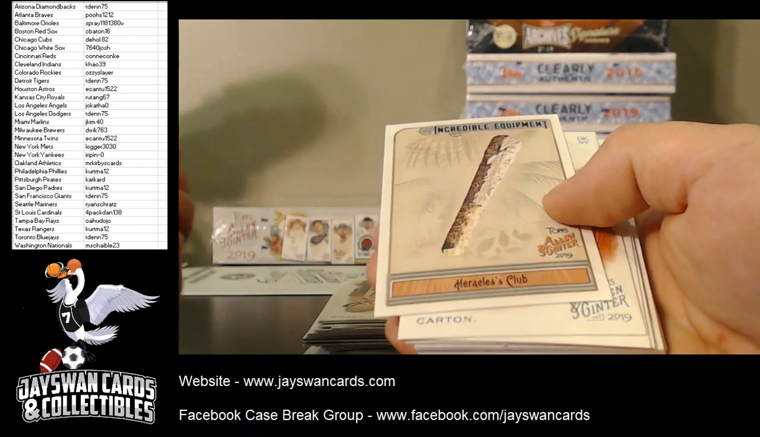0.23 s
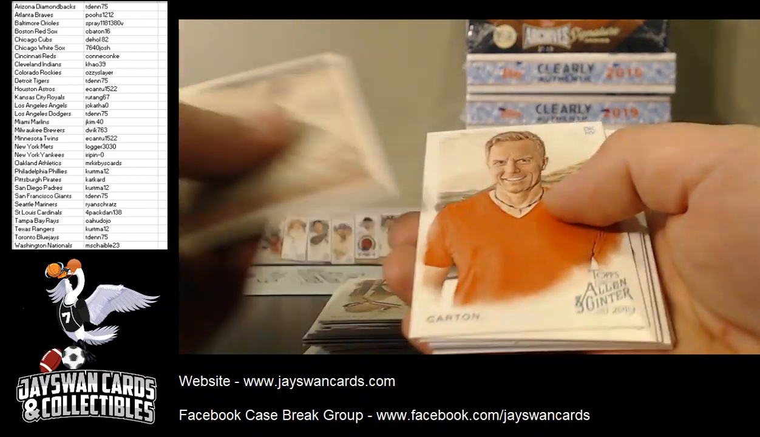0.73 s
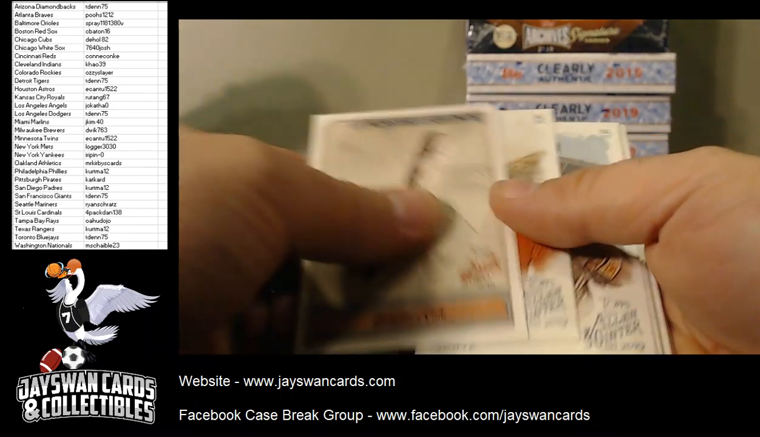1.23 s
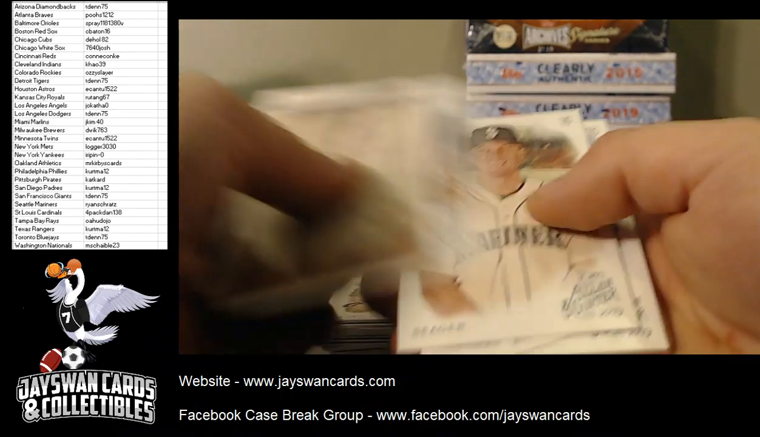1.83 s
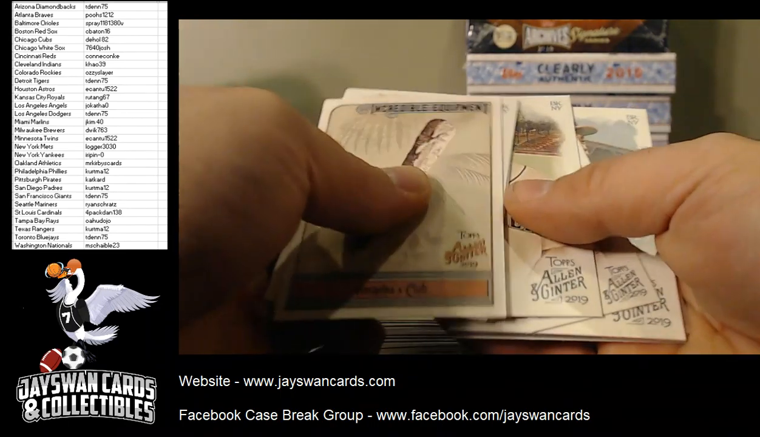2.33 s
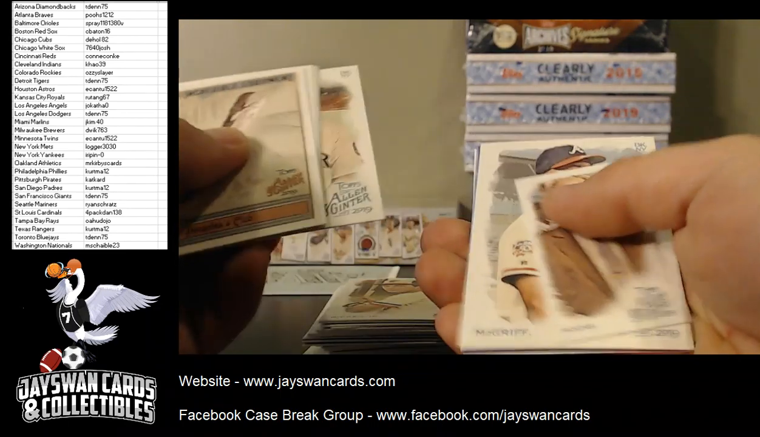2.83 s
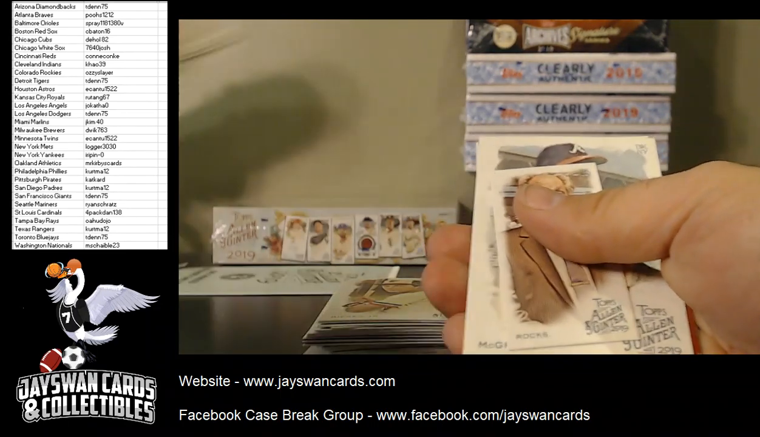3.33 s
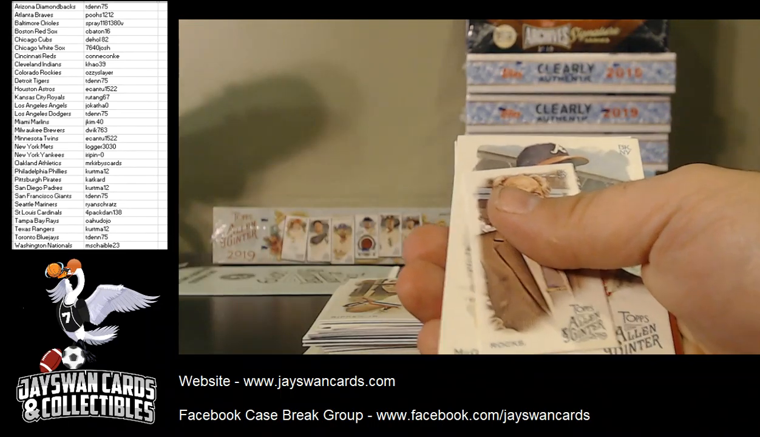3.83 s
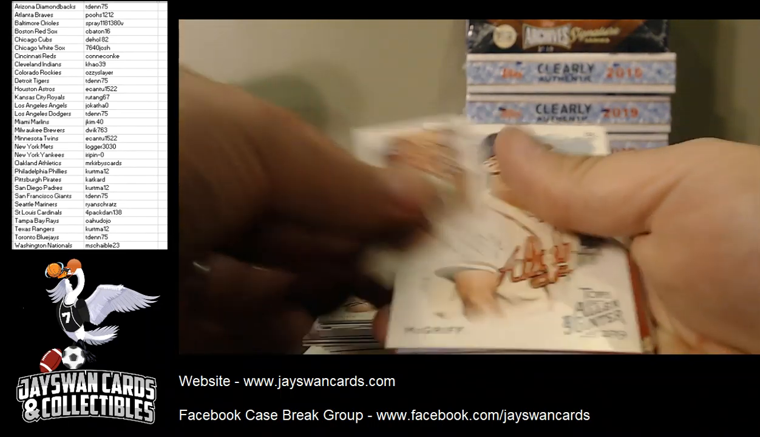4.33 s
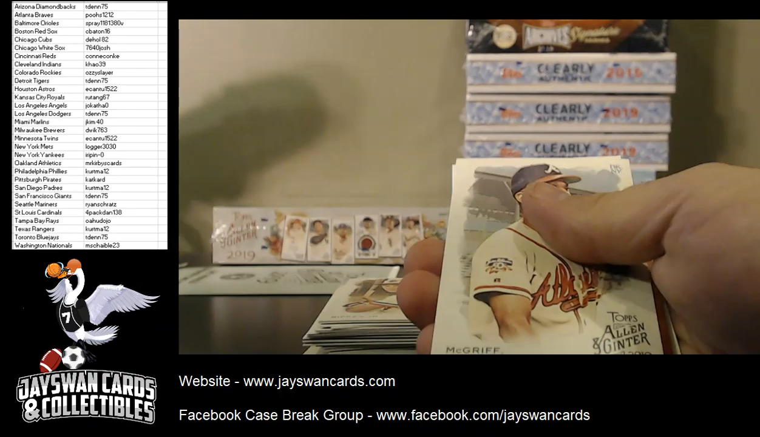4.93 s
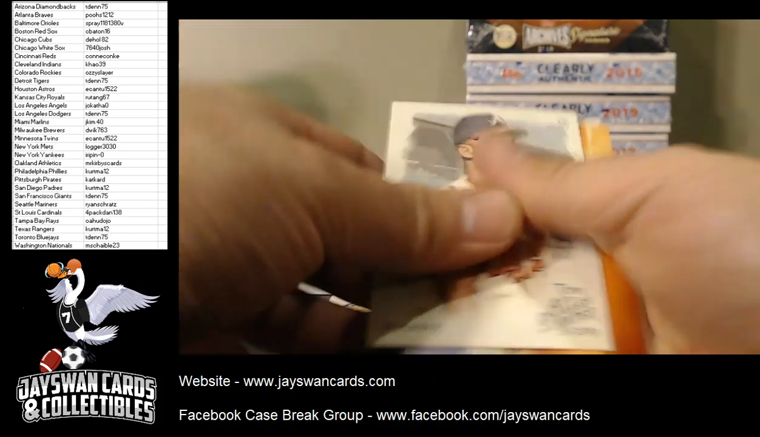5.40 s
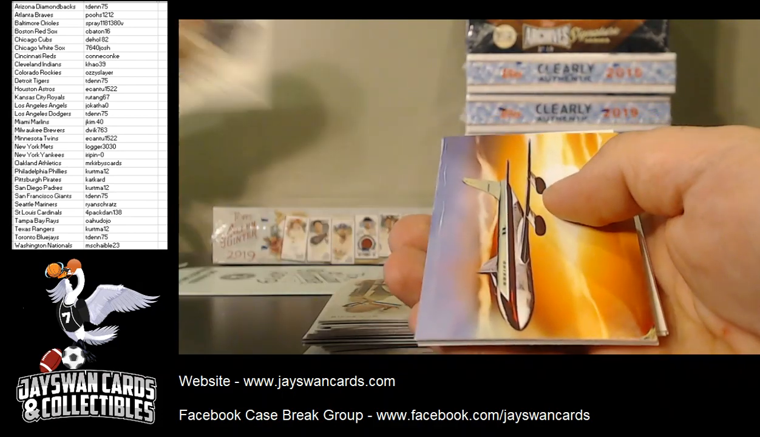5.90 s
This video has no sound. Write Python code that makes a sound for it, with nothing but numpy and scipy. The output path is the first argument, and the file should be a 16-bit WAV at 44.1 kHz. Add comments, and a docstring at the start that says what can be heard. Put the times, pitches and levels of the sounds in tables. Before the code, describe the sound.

Close, papery swishes and clicks of cards being flipped through by hand, with two louder table knocks near the end.

```python
"""A quick hiss and a few sharp ticks: trading cards thumbed one by one off a hand-held stack,
close to the stereo microphone of a camera standing on a table in a small room.
Card faces rub as they slide, edges catch and snap free, and midway a thumb judders over the top card.
The hands bump the table, which thuds and sets the camera stand swaying. Faint room hum lies behind."""
import sys
import numpy as np
from scipy import signal
from scipy.fft import rfft, irfft
from scipy.io import wavfile
from scipy.ndimage import uniform_filter1d

SR = 44100
rng = np.random.default_rng(int(sys.argv[2]) if len(sys.argv) > 2 else 0)


def materialize(psi):
    """Save the field psi as 16-bit PCM at rate SR to the path in sys.argv[1].

    A 1-D psi becomes a single channel; in a 2-D psi each row is a channel.
    """
    bounded = np.clip(np.atleast_2d(psi).T, -1, 1)
    quanta = np.round(bounded * 32767).astype(np.int16)
    wavfile.write(sys.argv[1], SR, quanta)


N = 271653
TIME = np.arange(N) / SR
BAND_LIMIT_HZ = 15950

# Card sliding over card: top_speed_s, rise_s, fall_s, hiss_db, scrape_re_hiss_db, gap_pitch_hz
CARD_STROKES = [ (.06, 0.11, 0.1, -53.5, -4.5, 3300), (.105, 0.022, 0.016, -45, -3, 3125),
                (.143, 0.016, 0.02, -44.5, -8, 3340), (.63, 0.20384, .19, -62.5, -4.5, 2600),
                (.722, 0.039, 0.04636, -59.5, -4.5, 4200), (.945, 0.16, 0.053, -65.5, -5, 2200),
                (1.47, 0.099, 0.029, -59.5, -3.5, 2980), (1.545, 0.062, 0.12, -46.5, -8, 3930),
                (1.70, 0.18, 0.13994, -60.5, -4, 3580), (2.09, 0.11, 0.14, -50.5, -6.5, 5030),
                (2.10, 0.029, 0.024, -46.5, -1, 5170), (2.285, 0.098, 0.08, -49.5, -8.5, 4180),
                (2.375, 0.073, 0.097, -55, -0.5, 2970), (2.5, 0.16, 0.15, -55, -6.5, 3800),
                (2.59, 0.064, 0.12, -46, -9, 3940), (2.77, 0.083, 0.1, -43.5, -11.5, 4500),
                (2.812, 0.026, 0.058, -54, -3, 3600), (2.92, 0.073, 0.073, -55.5, 0, 2410),
                (3.02, 0.085, 0.16, -51.5, -8, 3800), (3.18, 0.079, 0.099, -47.5, -9.5, 4300),
                (3.44, 0.22, 0.09, -60, -2, 3440), (3.566, 0.063, 0.085, -44, -10, 3360),
                (3.73, 0.22, 0.19, -56.5, -1.5, 2500), (3.97, .17, 0.17, -64, -3, 2800),
                (4.135, .04, 0.053, -55.5, -4, 2780), (4.21, 0.11, 0.051, -55, -2.5, 2909),
                (4.45, 0.12, 0.053, -60.5, -4.5, 3650), (4.607, 0.033, 0.051, -40.5, -9, 5150),
                (4.645, .04, .1, -46, -7, 4740), (5.09, 0.19, 0.26, -61, -4, 3800),
                (5.332, .14, 0.088, -46, -9, 4230), (5.575, .11, .045, -55.5, -4.5, 3400),
                (5.74, 0.031, 0.039, -54.5, -4, 3100), (5.795, 0.053, 0.027, -43.5, 0, 3130),
                (5.827, 0.013, 0.026, -41.5, -5.5, 3200), (5.88, 0.021, 0.013, -52, -18, 3300)]
# Card faces rubbing: frequency_hz, density_db
FRICTION_SPECTRUM = [(120, -29), (200, -9.5), (409, -5), (519, -8), (623, -10), (916, -6), (1400, -11.5),
                     (1870, -6.5), (2960, -8), (3250, -7.5), (4860, -6.5), (5330, -9.5), (7270, -5.5),
                     (14600, -13.5), (16000, -13)]
# Rumble of the moving hands: frequency_hz, density_db
HAND_SPECTRUM = [(12, -28), (20, 7), (73, -3), (145, -19), (292, -9.5), (357, -47), (398, -12), (500, -29),
                 (650, -62), (1100, -120)]
# Edges catching and letting go: start_s, level_db, tilt_db_per_octave, decay_ms, stack_ring_db
EDGE_TICKS = [(0.0117, -42.5, -3.5, 1.3, 4.5), (0.0424, -49.5, -4, 3.7, 11.5), (.096, -37.5, -2, 1.7, -8),
              (0.103, -39.5, -16, 3.1, -17), (0.1067, -37, -1.5, 2, -0.5), (0.1178, -42.5, -6.5, 1, 9),
              (1.633, -44.5, -0.5, 3.9, 4.5), (1.762, -52.5, 1, 4.4, -6), (2.0633, -44, -4.5, 1.7, 1),
              (2.093, -41, -9.5, 3, -12), (2.103, -37.5, 2.5, 5.5, -18), (2.361, -50.5, -0.5, 4.53, 7.5),
              (2.567, -47, -6.5, 6.4, 4.5), (2.575, -35.5, 7.5, 7.3, -28), (3.151, -44, -5, 9.1, 3.5),
              (3.299, -51.5, -4.5, 1.2, 4), (3.599, -43.5, -3.5, 2.8, 5), (3.661, -55.5, -12, 1.8, 7),
              (4.544, -46, -7, 2.8, 0), (4.594, -45.5, 0, 5, -8), (4.691, -44.5, -1.5, 2.2, -18),
              (5.368, -39, -6.5, 1.6, -4.5), (5.7, -59, 5, 3, -10), (5.7177, -42, -5, 1.4, 6.5),
              (5.7625, -22.5, 0, 1.95, -6.5), (5.777, -43, -5, 2.3, -16), (5.8088, -33, -3.5, 0.2, 3)]
# The crack of a card edge: frequency_hz, density_db
EDGE_SPECTRUM = [(120, -35), (200, -9.5), (763, -6.5), (1180, -6.5), (2020, -6.5), (2330, -1), (3430, -4.5),
                 (3900, -1.5), (6050, -2.5), (7540, -4), (8900, -5.5), (13600, -10.5), (16000, -29)]
# The held stack ringing: pitch_hz, level_db, t60_s
STACK_MODES = [(182, -8.5, 0.098), (231, 5, 0.073), (313, 2, 0.05), (469, -2, 0.051), (700, -7, 0.076),
               (1052, -10.5, 0.056), (1770, -4.5, 0.015)]
# One card flexing: pitch_hz, level_db, t60_s
CARD_MODES = [(1080, -30, 0.052), (1280, 1.5, 0.012), (1787, 5.5, 0.0091), (2355, -1.5, 0.022)]
# A card corner skidding: start_s, level_db, centre_hz, width_hz, length_ms
CORNER_SCUFFS = [(.104, -36, 3150, 400, 6), (.351, -51.5, 1130, 380, 8), (.863, -47.5, 11800, 5500, 10),
                 (3.598, -47, 2050, 1200, 8)]
# Skin slipping on card, muffled by the hand: frequency_hz, density_db
THUMB_SPECTRUM = [(40, -7), (85, 5), (130, 2), (185, 5.5), (240, -17), (310, -6.5), (450, -15), (700, -24),
                  (1100, -20), (2500, -27.5), (5000, -59)]
# Hands landing on the table: start_s, level_db, contact_ms, stand_sway_db
HAND_BUMPS = [(0.125, -40, 6.2, -24), (0.657, -42.5, 17, -36), (1.489, -38, 5.9, -40),
              (1.628, -41, 2.41, -39), (1.748, -40, 5.2, -45), (2.117, -44, 9, -46.5),
              (2.338, -43.5, 2.7, -44), (2.396, -44, 3.722, -38), (2.887, -46, 8.1, -41.5),
              (2.942, -40.5, 8.3, -36.5), (3.193, -45, 1.3, -42), (3.717, -36, 7.1, -45),
              (3.76, -40, 9.6, -58), (4.059, -40, 18, -42.5), (4.553, -32, 3, -44), (4.674, -31, 3.8, -33),
              (4.7003, -12.5, 0.78, -54), (4.705, -12.5, 7.6, -26), (5.187, -49.5, 7.1, -40.5),
              (5.815, -31, 11, -23.5)]
# The table under the camera: pitch_hz, level_db, t60_s
TABLE_MODES = [(69.2, -0.5, 0.48), (79, 7.5, 0.15), (98, -8.5, 0.19), (197, -16.5, 0.26), (230, -15, 0.21),
               (276, -1.5, 0.054), (362, 1.5, 0.012), (590, -8.5, 0.021), (694, -4.5, 0.017),
               (1948.9, 6, 0.0037)]
# The two ways the camera stand rocks: rate_hz, t60_s, left_db, right_db, right_lag_rad
STAND_MODES = [(25.02, 0.44, -13.5, 9, 0.98), (26.88, 1.46, -3, -4, 2.27)]
# Decay of the small room: frequency_hz, t60_s
ROOM_DECAY = [(100, 0.46), (500, 0.38), (2000, 0.29), (8000, 0.28), (16000, 0.019)]
# Steady room noise: frequency_hz, density_db
ROOM_SPECTRUM = [(59, -31), (100, -3), (170, -8), (558, -15.5), (768, -17.5), (1010, -15), (1480, -18),
                 (1870, -13), (2270, -19.5), (2860, -19.5), (3250, -23.5), (4020, -26), (12700, -33),
                 (16000, -30.5)]
# Electrical hum and a thin whine: pitch_hz, level_db
HUM_TONES = [(120, -69.5), (280, -76), (560, -79), (1922, -75), (15493, -78.5)]


def card_slides(gap_width_hz=1200, split_hz=3700, firm_db=-53):
    """Fast strokes hiss, pressed ones scrape and ring the gap between cards; the hands rumble beneath."""
    hiss, scrape, gap, gap_hz = stroke_controls()
    bright = amp(-.6) * hiss * unit(band(paper_friction(), split_hz, BAND_LIMIT_HZ + 2000, order=3))
    dull = amp(-2) * scrape * unit(band(paper_friction(), 230, split_hz, order=3))
    hollow = gap * unit(resonate(paper_friction(), gap_hz, gap_width_hz))
    effort = uniform_filter1d(np.minimum(scrape, amp(firm_db)), size=3000)
    rumble = amp(1) * effort * unit(colour(rng.standard_normal(N), HAND_SPECTRUM))
    return bright + dull + hollow + rumble


def stroke_controls(hiss_power=1.67, scrape_power=.91):
    """Hiss, scrape and gap ring grow with card speed; returns their strengths and the gap's pitch."""
    hiss, scrape, gap, weighted_hz = np.zeros((4, N))
    for peak_s, rise_s, fall_s, db, scrape_db, gap_hz in CARD_STROKES:
        speed = swing(peak_s, rise_s, fall_s)
        on = np.flatnonzero(speed)
        rubbing = amp(db + scrape_db) * speed[on] ** scrape_power
        # Pressed strokes ring the gap more and close it, raising its pitch; light ones glide down.
        ringing = rubbing * amp(-1.5 + .87 * scrape_db)
        octaves_per_s = 3.8 + 1.2 * scrape_db
        hiss[on] += (amp(db) * speed[on] ** hiss_power) ** 2
        scrape[on] += rubbing ** 2
        gap[on] += ringing ** 2
        weighted_hz[on] += ringing ** 2 * gap_hz * 2 ** (octaves_per_s * (TIME[on] - peak_s))
    sounding = gap > 0
    pitch_hz = np.interp(TIME, TIME[sounding], weighted_hz[sounding] / gap[sounding])
    return np.sqrt(hiss), np.sqrt(scrape), np.sqrt(gap), pitch_hz


def swing(peak_s, rise_s, fall_s, jerk=.33):
    """Speed of one hand movement, 0 to 1: an arch from rest to rest, more pointed the jerkier the hand."""
    from_peak = np.minimum(abs(TIME - peak_s) / np.where(TIME < peak_s, rise_s, fall_s), 1)
    return 1 - from_peak ** (2 - jerk)


def paper_friction(catches_per_s=2500, flutter_db=1.42):
    """Countless paper fibres catch and slip: a smooth rush with sparse larger grains."""
    grains = rng.standard_normal(N) * (rng.random(N) < catches_per_s / SR)
    rush = .92 * rng.standard_normal(N) + .5 * unit(grains)
    return colour(rush, FRICTION_SPECTRUM) * amp(flutter_db * wander(63.62))


def hand_reflection(x, share=.18, typical_delay_s=.000797):
    """An echo off the moving hand ripples the hiss on its way to the microphone."""
    delay_s = typical_delay_s * np.exp(.165 * wander(3.8))
    return x + share * np.interp(TIME - delay_s, TIME, x)


def edge_ticks(slap_db=11):
    """An edge lets go with a slap and a short chatter; the stack rings, and hard snaps flex the card."""
    out, t = np.zeros(N), TIME[:SR // 2]
    stack = ring(STACK_MODES)
    stack /= abs(stack).max()
    flex = unit_burst(ring(CARD_MODES), length_ms=5)
    hardest_db = max(row[1] for row in EDGE_TICKS)
    for start_s, db, tilt_db, decay_ms, stack_db in EDGE_TICKS:
        chatter = rng.standard_normal(len(t)) * np.exp(-1000 * t / decay_ms)
        chatter[0] = amp(slap_db)
        crack = unit_burst(colour(chatter, EDGE_SPECTRUM, tilt_db), length_ms=5)
        bend = amp(db - hardest_db - 3)
        add(out, start_s, -amp(db) * (crack + bend * flex + amp(stack_db + 2) * stack))
    return out


def corner_scuffs():
    """A card corner skids for an instant, sounding in a narrow band."""
    out = np.zeros(N)
    for start_s, db, hz, width_hz, length_ms in CORNER_SCUFFS:
        envelope = pulse(TIME[:SR // 8], length_ms)
        skid = band(rng.standard_normal(len(envelope)) * envelope, hz - width_hz / 2, hz + width_hz / 2)
        add(out, start_s, amp(db) * unit_burst(skid, length_ms))
    return out


def thumb_judder(peak_s=3.35, rise_s=.13, fall_s=.18, slips_per_s=92, uneven=.42, level_db=-41.5):
    """The thumb sticks and slips on the top card, quickening; the edge scratches faintly with each slip."""
    rate = slips_per_s * np.exp(.9 * np.clip(TIME - peak_s, -rise_s, fall_s))
    slip_count = np.cumsum(rate * np.exp(uneven * wander(70))) / SR
    slips = np.diff(np.floor(slip_count), prepend=0) * amp(.5 * rng.standard_normal(N))
    scratch = unit(colour(slips, FRICTION_SPECTRUM, tilt_db=-2))
    creak = unit(band(colour(slips, THUMB_SPECTRUM), 43, 2600))
    push = swing(peak_s, rise_s, fall_s) ** 1.7
    return amp(level_db) * push * (creak + amp(-20) * scratch)


def table_thuds(left_db=3, right_db=-2, shiver_db=-11):
    """Soft pushes reach only the table's low modes, a hard knock all; the stand shivers sideways."""
    thud = np.zeros(N)
    table = band(ring(TABLE_MODES), 57, BAND_LIMIT_HZ)
    for start_s, db, contact_ms, _ in HAND_BUMPS:
        blow = signal.fftconvolve(table, pulse(TIME[:SR // 10], contact_ms))
        add(thud, start_s, amp(db) * blow / abs(blow).max())
    shaking = uniform_filter1d(abs(thud), size=600)
    shiver = amp(shiver_db) * shaking * unit(band(rng.standard_normal(N), 89, 190))
    return thud * amp([[left_db], [right_db]]) + np.array([shiver, -shiver])


def stand_sway(rise_s=.023):
    """Each bump leaves the camera stand rocking: a deep wobble, different in each channel."""
    sway, t = np.zeros((2, N)), TIME[:2 * SR]
    rocking = np.zeros((2, len(t)))
    for hz, t60, left_db, right_db, lag in STAND_MODES:
        decay = amp([[left_db], [right_db]] - 60 * t / t60)
        rocking += decay * np.sin(2 * np.pi * hz * t - [[0], [lag]])
    rocking *= (1 - np.exp(-t / rise_s)) ** 2
    for start_s, _, _, sway_db in HAND_BUMPS:
        add(sway, start_s, amp(sway_db) * rocking)
    return sway


def close_microphone(sliding, contacts, side_db=-7, pan_db=.47, right_lag_samples=.45):
    """The cards are close and a little to the right; scattered hiss and quick echoes come from the sides."""
    t = TIME[:SR // 40]
    taps = rng.standard_normal(len(t)) * np.exp(-t / .003)
    echoes = signal.fftconvolve(contacts, taps / np.linalg.norm(taps))[:N]
    side = amp(side_db) * (card_slides() + echoes)
    left = sliding * amp(-pan_db) + contacts
    right = sliding * amp(pan_db) + contacts
    lag = np.exp(-2j * np.pi * np.fft.rfftfreq(N) * right_lag_samples)
    return np.array([left + side, irfft(rfft(right) * lag, N) - side])


def room_tail(x, level_db=-15):
    """The small room returns a short tail whose treble dies first, different in each channel."""
    t = TIME[:SR // 2]
    reflections = rng.standard_normal((2, len(t))) * (rng.random((2, len(t))) < .1) * (t > .004)
    hz, age_s, spectra = signal.stft(reflections, SR, nperseg=256)
    decay = amp(-60 * age_s / read(ROOM_DECAY, hz)[:, None])
    tail = signal.istft(spectra * decay, SR, nperseg=256)[1][:, :len(t)]
    tail /= np.linalg.norm(tail, axis=1, keepdims=True)
    return amp(level_db) * signal.fftconvolve(x[None], tail, axes=1)[:, :N]


def room_tone(noise_db=-60.5, rumble_db=-53.5):
    """Behind the cards: steady room noise with a low rumble, mains hum and a thin whine."""
    common, left, right = (unit(colour(rng.standard_normal(N), ROOM_SPECTRUM)) for _ in range(3))
    noise = unit(amp(3) * common + np.array([left, right]))
    rumble = np.array([unit(band(rng.standard_normal(N), 17.4, 45.7)) for _ in range(2)])
    hum = np.zeros(N)
    for hz, db in HUM_TONES:
        wavering_hz = hz + 1.42 * wander(5.24)
        hum += amp(db) * np.sin(2 * np.pi * np.cumsum(wavering_hz) / SR)
    return amp(noise_db) * noise + amp(rumble_db) * rumble + hum


def amp(db):
    """Decibels to gain."""
    return 10 ** (np.asarray(db) / 20)


def unit(x):
    """Scales to rms 1."""
    return x / np.sqrt(np.mean(x ** 2) + 1e-20)


def unit_burst(x, length_ms):
    """Scales to the energy of rms 1 held for length_ms."""
    return x / np.sqrt(np.sum(x ** 2) / (length_ms * SR / 1000))


def pulse(t, length_ms):
    """A contact that peaks a quarter of the way through length_ms, then dies away."""
    age = 4000 * t / length_ms
    return age * np.exp(-age)


def read(points, hz):
    """Reads a table on a log-frequency axis."""
    points_hz, values = np.transpose(points)
    return np.interp(np.log(hz + 1), np.log(points_hz + 1), values)


def add(mix, start_s, sound):
    """Mixes a sound in at start_s."""
    part = mix[..., max(round(start_s * SR), 0):][..., :sound.shape[-1]]
    part += sound[..., :part.shape[-1]]


def colour(x, spectrum, tilt_db=0):
    """Minimum-phase filter with the given spectrum, tilted by tilt_db per octave above 300 Hz."""
    hz = abs(np.fft.fftfreq(4096, 1 / SR))
    db = np.maximum(read(spectrum, hz), -90) + tilt_db * np.log2(np.maximum(hz, 300) / 3000)
    response = np.exp(np.conj(signal.hilbert(np.log(amp(db)))))
    return signal.fftconvolve(x, np.fft.ifft(response).real)[:len(x)]


def band(x, lo_hz, hi_hz, order=2):
    """Band-pass filter."""
    return signal.sosfilt(signal.butter(order, [lo_hz, hi_hz], "band", fs=SR, output="sos"), x)


def wander(hz):
    """Slow random motion of rms 1, up to about hz."""
    rolloff = 1 + (np.fft.rfftfreq(N, 1 / SR) / hz) ** 4
    return unit(irfft(rfft(rng.standard_normal(N)) / rolloff, N))


def ring(modes):
    """Impulse response of a set of dying modes."""
    t = TIME[:SR // 2]
    return sum(amp(db - 60 * t / t60) * np.sin(2 * np.pi * hz * t) for hz, db, t60 in modes)


def resonate(x, hz, width_hz):
    """A resonance that follows the curve hz."""
    carrier = np.exp(2j * np.pi * np.cumsum(hz) / SR)
    pole = np.exp(-np.pi * width_hz / SR)
    return (carrier * signal.lfilter([(1 - pole) ** 2], [1, -2 * pole, pole * pole], x / carrier)).real


def scene():
    """From the camera's place: cards just in front, the table below, the room all around."""
    sliding = hand_reflection(card_slides())
    contacts = edge_ticks() + corner_scuffs() + thumb_judder()
    thuds = table_thuds()
    near = close_microphone(sliding, contacts) + thuds + stand_sway()
    return near + room_tail(sliding + contacts + thuds.mean(0)) + room_tone()


def record(dry):
    """The camera's recorder cuts off the highest treble."""
    lowpass = signal.firwin(511, BAND_LIMIT_HZ, window=("kaiser", 9), fs=SR)
    return signal.oaconvolve(dry, lowpass[None], "same")


dry = scene()
out = record(dry)
materialize(out)
```